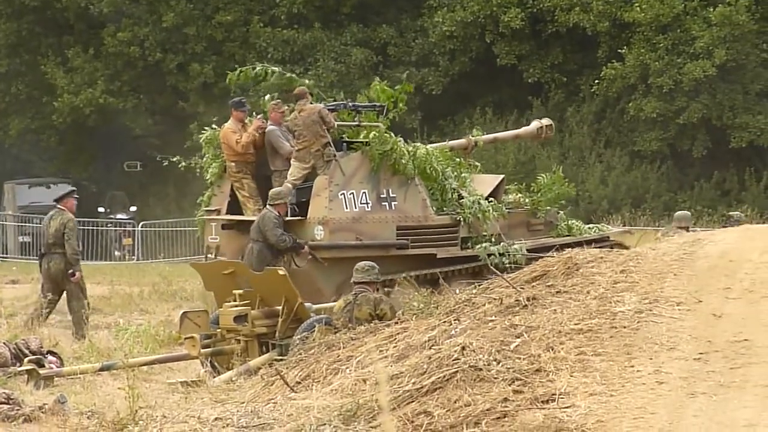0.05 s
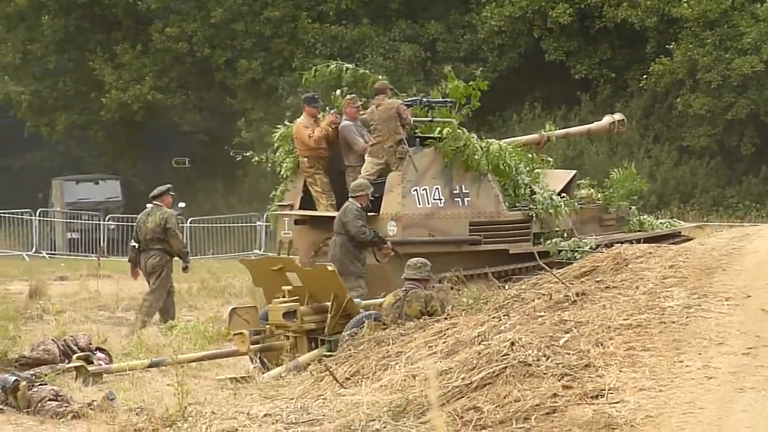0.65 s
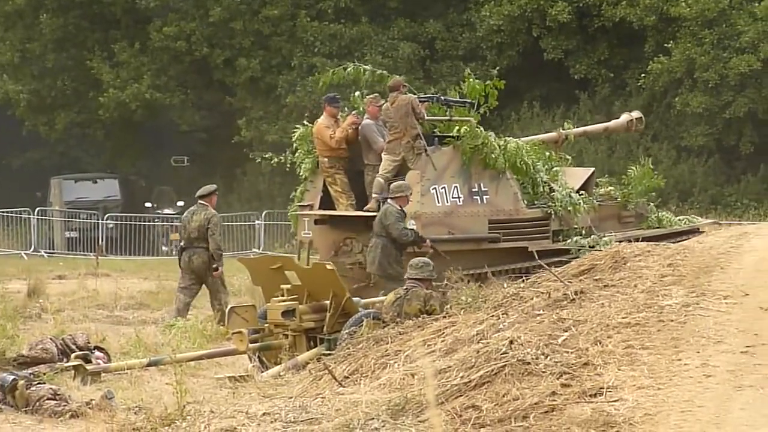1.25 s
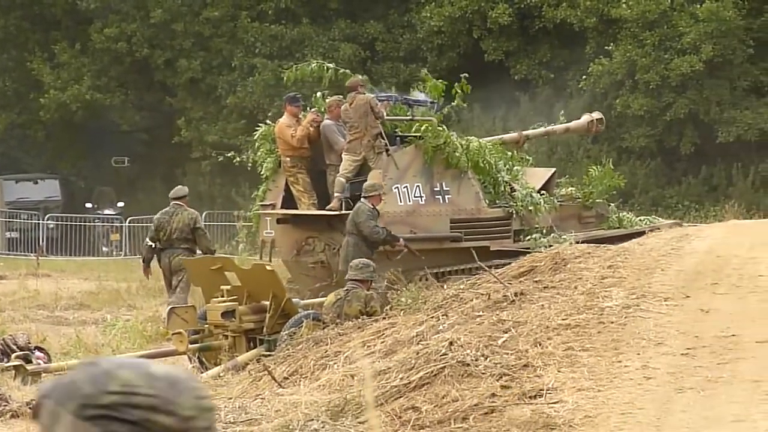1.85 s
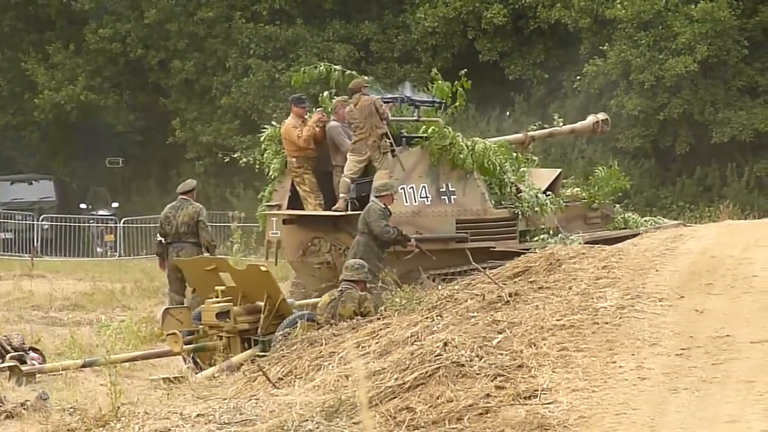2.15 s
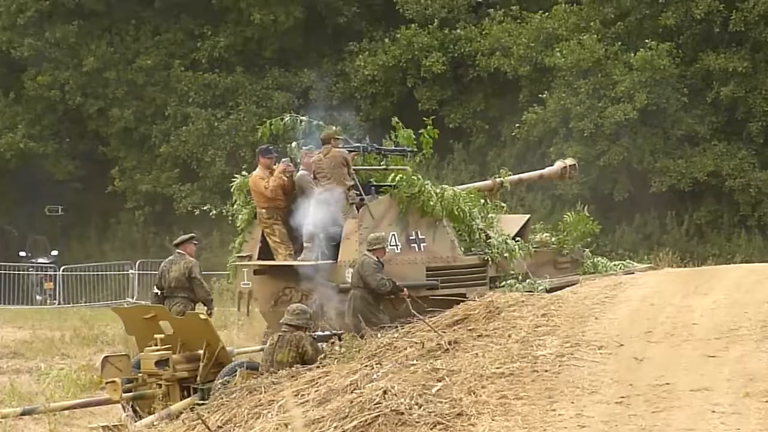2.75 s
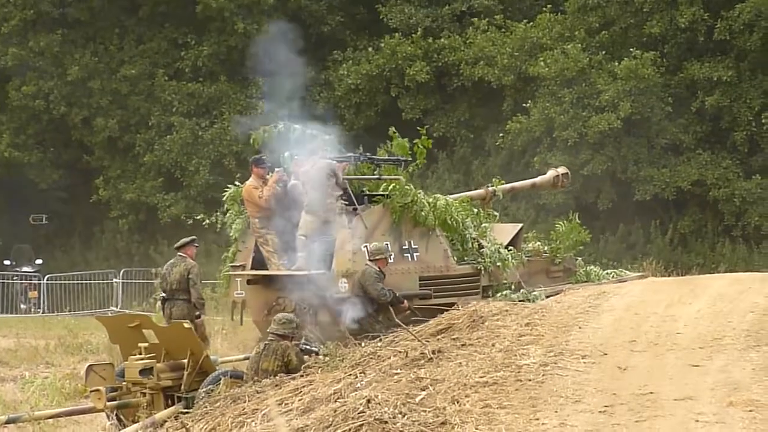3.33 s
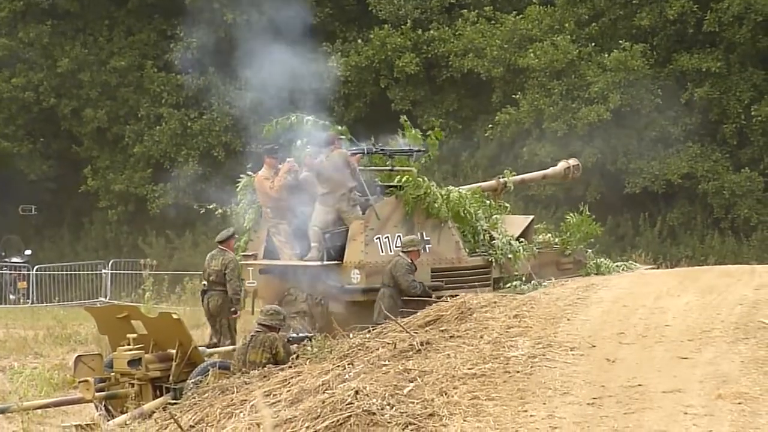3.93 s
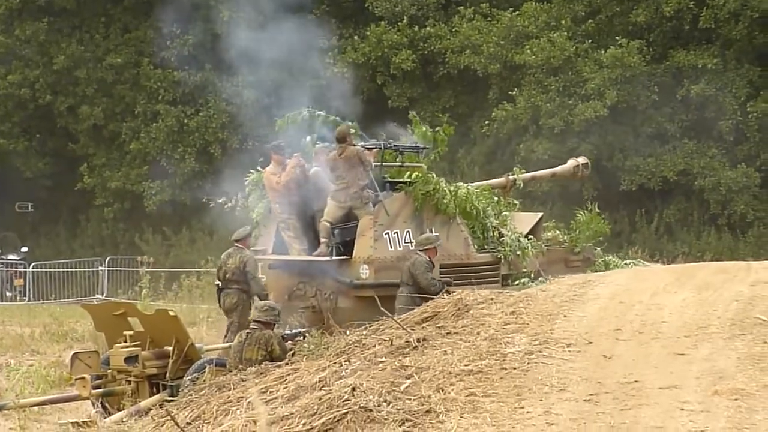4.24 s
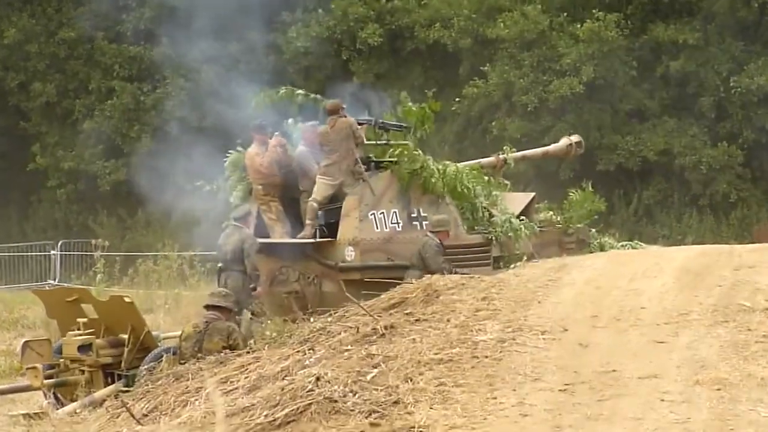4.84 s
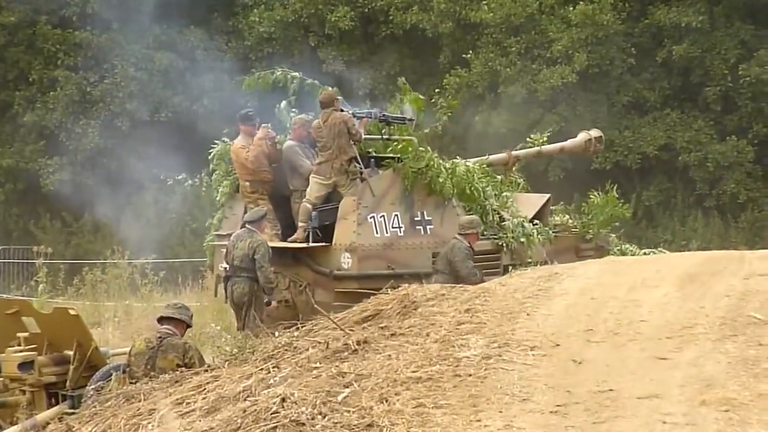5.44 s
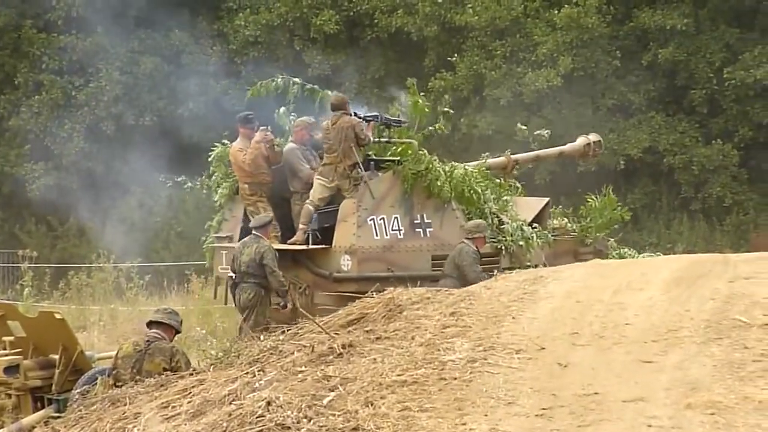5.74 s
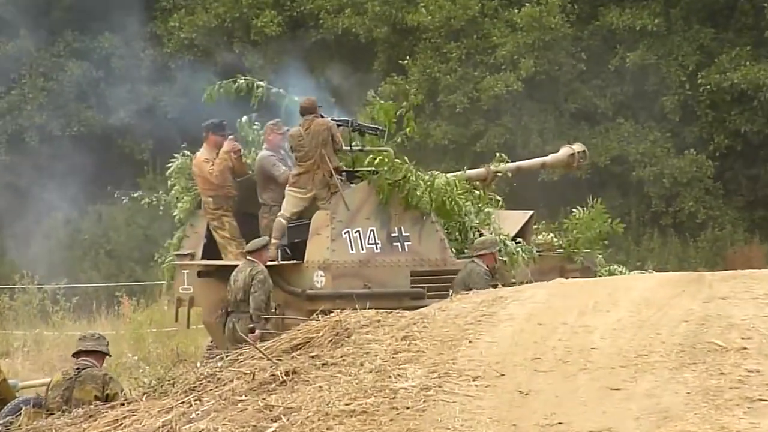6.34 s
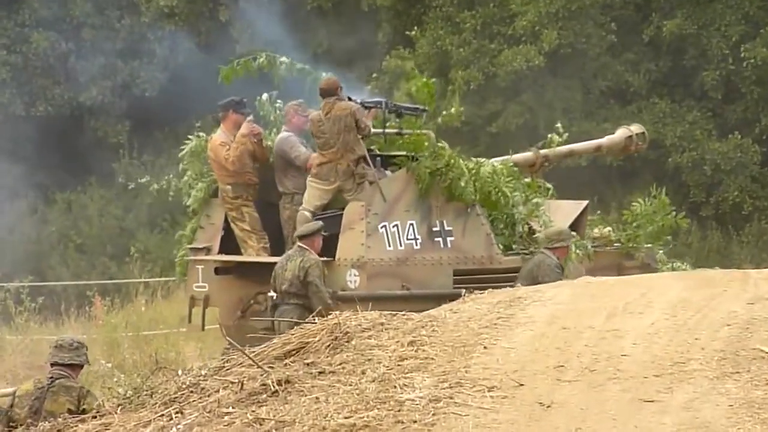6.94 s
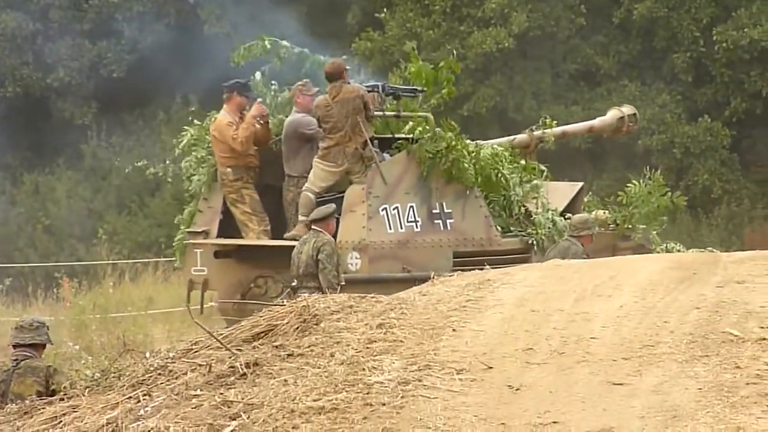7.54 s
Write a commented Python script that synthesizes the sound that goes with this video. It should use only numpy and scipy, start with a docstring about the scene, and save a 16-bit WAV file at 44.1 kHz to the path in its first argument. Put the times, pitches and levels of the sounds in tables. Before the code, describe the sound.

A machine gun fires four short bursts of blanks outdoors, with nearer pistol and rifle shots echoing off trees over a diesel engine.

```python
"""In a field by a wood, a machine gun on an armoured vehicle fires four bursts of blanks.
A machine pistol and rifles fire nearer by. Each shot is a sharp jump in air pressure that bounces
off things around it, and the trees roll it back as an echo. A diesel engine knocks, speeds up,
then sinks behind the shooting. The microphone hisses faintly; a limiter (an automatic volume
control) turns loud shots down, and the sharpest peaks clip."""
import sys
import numpy as np
from scipy import signal
from scipy.io import wavfile
from scipy.ndimage import uniform_filter1d, minimum_filter1d

SR = 44100
rng = np.random.default_rng(int(sys.argv[2]) if len(sys.argv) > 2 else 0)


def pcm_store(signal):
    """Save signal as 16-bit PCM."""
    levels = np.round(np.clip(np.atleast_2d(signal), -1, 1) * 32767)
    wavfile.write(sys.argv[1], SR, levels.astype(np.int16).T)


N = 338688

# the microphone's own hiss: f/Hz, level/dB
HISS_COLOUR = [(100, -22), (3000, -22), (11500, -21), (12700, -11), (13400, -1), (14200, -1), (15000, -7),
               (15800, -16)]
# narrow bands that sound hollow, the lowest cancelled by a bounce off the ground,
# the others in the microphone: f/Hz, width/Hz, depth/dB
HOLLOW_BANDS = [(879, 104, -7.5), (2595, 476, -30), (4600, 890, -19.5), (7840, 390, -24)]
# how much the microphone's two openings differ: f/Hz, side over mid/dB
STEREO_WIDTH = [(40, 4), (130, -48), (600, -24), (1200, -16), (2400, -4.5), (5000, -3.5), (14000, -10)]

# engine loudness as it sinks behind the shooting: t/s, level/dB
ENGINE_LEVEL = [(0, -30.5), (1.15, -29.5), (1.6, -31.5), (2.7, -35), (4, -39.5), (7.7, -43.5)]
# tone of the engine noise: f/Hz, level/dB
ENGINE_COLOUR = [(30, -36), (70, -25), (150, -14.5), (300, -8), (460, -7.5), (640, -0.5), (1150, -6.5),
                 (1500, -11), (2200, -7), (3300, -12), (6500, -7.5), (9000, -13.5), (15000, -13.5)]
# engine position as the microphone turns: t/s, left over right/dB
ENGINE_PAN = [(0, -1), (.8, -1.2), (1.6, 0.5)]
# ringing exhaust and engine covers: f/Hz, width/Hz, idle level/dB, level at speed/dB
COVER_RINGS = [(289.4, 24, -21, -16), (374, 34, -14.5, -17), (642, 45, -10.5, -15), (770, 27, -6.5, -6.5),
               (1014, 12, -14, -9.5), (1107, 50, -15.5, -6), (2120, 54, -26, -15.5),
               (2920, 100, -19, -15.5), (3510, 110, -19, -16)]
# each cylinder's knock: level/dB
CYLINDER_KNOCKS = [-1, -7, -12, -2]

# tone of the echo: f/Hz, level/dB
ECHO_COLOUR = [(50, -57), (130, -27.5), (260, -20.5), (420, -7.5), (680, 4), (1100, -1), (1700, -3.5),
               (2300, -11), (3500, -11.5), (6500, -11.5), (10000, -18.5), (15500, -30)]
# what air and leaves soak up: f/Hz, loss/(dB per s)
ECHO_LOSS = [(200, 1.1), (700, 2.3), (1500, 8.5), (3500, 21.2), (7000, 32.2), (14000, 74)]
# machine gun echoes from ground and wood: delay/s, spread/doublings of delay, level/dB
FAR_ECHOES = [(0.026, 1.59, 12), (.48, 0.84, 0)]
# the nearer guns' echoes from ground, close trees and wood: delay/s, spread/doublings, level/dB
NEAR_ECHOES = [(0.049, 1.3, 3.5), (0.261, 0.13, 1.5), (1.2, .65, -2.5)]

# rifle shots: t/s, high crack/dB, low boom/dB, direct shock against its scatter/dB, echo/dB
RIFLE_SHOTS = [(2.3361, -13.5, -19.5, 0, 8), (7.0048, -15.5, -12.5, -10.5, 3),
               (7.0574, -17.5, -16, -3.5, 5.5), (7.2991, -23.5, -21, -2, -3.5)]
# tone of a rifle blast: f/Hz, level/dB
RIFLE_COLOUR = [(40, -33), (120, 3), (250, 14), (400, 2.5), (650, 18.5), (1100, 10.5), (1500, 2.5),
                (2300, 0.5), (3200, -15.5), (5000, -8), (7000, -13), (11000, -15), (15500, -27)]
# machine pistol shots: t/s, crack/dB, boom/dB, shock/dB, echo/dB
PISTOL_SHOTS = [(3.1709, -3, -5, -3, 4.5), (3.2527, -6, -5, -4, 4.5), (3.3386, -6.5, -7, -2, 4),
                (3.9441, -2, -1, 0, -3)]
# tone of a pistol blast: f/Hz, level/dB
PISTOL_COLOUR = [(40, -17), (120, -5), (280, 11), (450, 6), (650, 2.5), (1100, 9.5), (1500, 3.5),
                 (2300, 3.5), (3300, -11), (5000, -2), (7000, -8), (11000, -7), (15500, -16)]
# machine gun bursts; a hitch in the ammunition belt starts a new row:
# first shot/s, last shot/s, shots, start-up lag/s, crack/dB, boom/dB, shock/dB, echo/dB
GUN_BURSTS = [(1.6105, 1.9780, 8, 0.015, -8.5, -12.5, -4, 5),
              (3.6082, 3.9517, 8, 0.0065, -13.5, -15.5, -1, 0),
              (4.0221, 4.0217, 1, 0, -17.5, -22.5, 3, -1.5), (5.2712, 5.3737, 3, .0063, -12, -14.5, -5, 0),
              (5.4328, 5.7192, 7, .0037, -15, -13.5, -3, 1.5),
              (6.7755, 6.8742, 3, 0.0056, -8.5, -13.5, -5.5, 2)]
# tone of a machine gun blast: f/Hz, level/dB
GUN_COLOUR = [(40, -96), (90, -20), (150, -1.5), (350, 0.5), (650, 4), (1100, 2), (1700, -1.5),
              (3000, -11.5), (6500, -7.5), (11000, -14.5), (15500, -21.5)]
# its bounces off the vehicle's body and the ground: delay/s, level/dB
GUN_BOUNCES = [(.0012, -6.5), (.0034, -56), (.0092, -13), (0.0124, -8.5)]
# armour plates that it sets ringing: f/Hz, level/dB, time to fade by 60 dB/s
ARMOUR_RINGS = [(163, -39.5, 0.13), (631, -28, 0.12), (731, -22, 0.12), (1002, -21, 0.085),
                (1145, -26, 0.061), (1674, -18.5, 0.045)]


def amp(db):
    """Turns decibels into a number to multiply by."""
    return 10 ** (np.asarray(db) / 20)


def unit(x):
    """Scales a signal to an average size (rms) of 1."""
    return x / np.sqrt(np.mean(x ** 2) + 1e-20)


def curve(rows, t):
    """Reads a table of (t/s, value) at times t."""
    return np.interp(t, *np.transpose(rows))


def spectrum(rows, hz):
    """Reads a table of (f/Hz, value), with octaves evenly spaced."""
    f, value = np.transpose(rows)
    return np.interp(np.log(hz + 1), np.log(f), value)


def shape(x, db_at, size=4096):
    """Filters by db_at(Hz) so that nothing sounds before its cause (minimum phase)."""
    log_gain = np.log(amp(db_at(abs(np.fft.fftfreq(size, 1 / SR)))))
    taps = np.fft.ifft(np.exp(np.conj(signal.hilbert(log_gain)))).real
    return signal.oaconvolve(x, taps[None], axes=1)[:, :x.shape[1]]


def colour(x, rows):
    """Gives a sound the tone listed in a table."""
    return shape(x, lambda hz: spectrum(rows, hz))


def passband(x, kind, hz, order=2):
    """Lets through the lows, the highs or a band."""
    return signal.lfilter(*signal.butter(order, hz, kind, fs=SR), x)


def add(mix, s, sound):
    """Mixes a sound in at s seconds."""
    part = mix[:, round(s * SR):][:, :sound.shape[1]]
    part += sound[:, :part.shape[1]]


def drift(per_s):
    """A slow random wander, about 1 in size."""
    knots = rng.standard_normal(400)
    return np.interp(np.arange(N) / SR * per_s, np.arange(len(knots)), knots)


def left_right(sound):
    """Turns mid (what both ears share) and side (how they differ) into left and right."""
    side = colour(sound[1:], STEREO_WIDTH)[0]
    return np.array([sound[0] + side, sound[0] - side])


def hiss():
    """The microphone's own faint, high noise."""
    noise = unit(colour(rng.standard_normal((2, N)), HISS_COLOUR))
    return amp(-47.5) * noise * amp([[0], [-6]])


def engine(idle_per_s=35, fast_per_s=48.5, rev_at_s=.79, rev_s=.09, knock_s=0.0076, chug_hz=160):
    """Each firing of the diesel is a puff of noise that clatters and sets the covers ringing."""
    t = np.arange(N) / SR
    level_db = curve(ENGINE_LEVEL, t)
    speed = 1 / (1 + np.exp((rev_at_s - t) / rev_s))  # 0 at idle, 1 at speed
    rate = idle_per_s + (fast_per_s - idle_per_s) * speed
    firings = .3 + np.cumsum(rate) / SR
    firings += .22 * np.sin(np.pi * firings / 2) ** 2  # every second cylinder knocks early
    number = firings.astype(int)
    strength = amp(np.array(CYLINDER_KNOCKS)[number % 4] + 1.1 * rng.standard_normal(N)[number])
    knock = strength * np.exp(-(firings % 1) / rate / knock_s)
    body = unit((1 + knock) * rng.standard_normal((2, N)))
    # each knock is a cluster of small ticks
    grit = amp(1.1 * unit(uniform_filter1d(rng.standard_normal(N), size=60)))
    clatter = unit((0.3 + 1.57 * knock) * grit * rng.standard_normal((2, N)))
    clatter *= amp(-3.5 + 0.32 * (level_db - level_db.max()))  # duller as the engine sinks
    noise = passband(body, "low", 3000) + passband(clatter, "high", 3000)
    out = amp(-1.5) * unit(colour(noise, ENGINE_COLOUR))
    for hz, width, idle_db, fast_db in COVER_RINGS:
        ring = unit(signal.lfilter(*signal.iirpeak(hz, hz / width, SR), body))
        out += ring * amp(idle_db + (fast_db - idle_db) * speed + 3 * drift(7))
    # the exhaust chugs on every second firing, most clearly at idle
    age = (firings % 2) / rate
    chug = np.sin(2 * np.pi * chug_hz * age) * age * np.exp(-age / 0.005)
    out[0] += unit(chug) * amp(-15 - 16 * speed + 2.3 * drift(13))
    return out * amp(level_db)


def swell(echoes, t):
    """Level in dB, t seconds after a shot: each echo builds up to its delay, then fades more slowly."""
    power = sum(amp(db) ** 2 * np.exp(-(np.log2((t + 1e-3) / delay) / spread) ** 2)
                for delay, spread, db in echoes)
    return 10 * np.log10(power + 1e-12)


def wood_echo(rows, echoes, level_db, tilt_db, patchy_db, count=4):
    """Countless trunks and leaves throw each shot back; the later the echo, the duller."""
    out, tails = np.zeros((2, N)), []
    for _ in range(count):
        noise = unit(colour(rng.standard_normal((2, 5 * SR // 2)), ECHO_COLOUR))
        hz, t, bands = signal.stft(noise, SR, nperseg=512)
        # random louder and softer patches across pitch and time
        patches = uniform_filter1d(rng.standard_normal(bands.shape[1:]), size=12, axis=0)
        patches = unit(uniform_filter1d(patches, size=4, axis=1))
        db = swell(echoes, t) - np.outer(spectrum(ECHO_LOSS, hz), t) + patchy_db * patches
        db += tilt_db * np.log2(1 + hz / 1500)[:, None]
        tails.append(signal.istft(bands * amp(db), SR, nperseg=512)[1])
    for k, (s, *_, echo_db) in enumerate(rows):
        add(out, s, amp(level_db + echo_db) * tails[k % count])
    return out


def leaf_sizzle(rows, level_db, delay_s=0.055, fade_s=0.039, size=12000):
    """A wall of leaves throws back only the highest part of each near crack."""
    out, t = np.zeros((2, N)), np.arange(size) / SR
    for s, *_ in rows:
        sizzle = passband(rng.standard_normal((2, size)), "band", [8000, 13000])
        add(out, s + delay_s, amp(level_db) * unit(sizzle) * np.exp(-t / fade_s))
    return out


def blast(shock_db, surroundings, tone, scatter_db, scatter_s, bounces, rings=()):
    """One bang (mid, side): a shock, its bounces, scatter from things nearby and any ringing metal."""
    size = surroundings.shape[1]
    t = np.arange(size) / SR
    bang = np.zeros((2, size))
    bang[0, 0] = amp(shock_db)
    # the shock reaches one side of the microphone first
    bang[1, :3] = amp(shock_db) * rng.choice([-1, 1]) * np.array([.7, 0, -.7])
    for delay, db in bounces:
        late = t - delay * rng.uniform(.98, 1.02)
        smear = np.exp(-(late / .0001) ** 2)  # a rough surface smears and dulls the bounce
        bang[0] += amp(db) * smear / smear.sum()
    paths = .7 * surroundings + .7 * rng.standard_normal((2, size))
    scatter = passband(paths, "high", 420)  # small things scatter little bass
    bang += amp(scatter_db) * scatter * (1 + t / scatter_s) * np.exp(-t / scatter_s)
    for hz, db, fade_s in rings:
        struck_db = db + 2.5 * rng.standard_normal()
        bang[0] += amp(struck_db - 60 * t / fade_s) * np.sin(2 * np.pi * hz * t) / 10
    return colour(bang, tone)


def shots(rows, level_db, split_hz=2000, **gun):
    """One gun's bangs, each with its own share of low boom and high crack."""
    out = np.zeros((2, N))
    surroundings = rng.standard_normal((2, 6000))  # these scatter all of the gun's shots alike
    onset = 441  # the first 10 ms set the levels
    for s, crack_db, boom_db, shock_db, _ in rows:
        bang = blast(shock_db, surroundings, **gun)
        bass = passband(bang, "low", split_hz)
        treble = -passband(bang, "high", split_hz)
        boom = amp(boom_db) * bass / bass[0, :onset].std()
        crack = amp(crack_db) * treble / treble[0, :onset].std()
        add(out, s, boom + crack)
    return amp(level_db) * out


def rifles():
    """Single rifle bangs that sizzle in the leaves."""
    bangs = shots(RIFLE_SHOTS, level_db=11, tone=RIFLE_COLOUR, scatter_db=-25, scatter_s=0.003,
                  bounces=[(.0014, -36), (.0036, -7)])
    return bangs + leaf_sizzle(RIFLE_SHOTS, level_db=-31)


def machine_pistol(slap_s=.1258):
    """Short, sharp bangs that sizzle in the leaves and slap back off something flat and distant."""
    bangs = shots(PISTOL_SHOTS, level_db=1.1, tone=PISTOL_COLOUR, scatter_db=-19, scatter_s=0.0015,
                  bounces=[(.0012, -14.5)])
    out = bangs + leaf_sizzle(PISTOL_SHOTS, level_db=-27.5)
    add(out, slap_s, amp(-15) * passband(bangs, "band", [1200, 4500], order=1))
    return out


def burst_shots(lag_left=.3, uneven_db=(1.3, 1.7, 3.5)):
    """Lists the machine gun's shots: its sliding bolt starts slowly, then settles into a beat."""
    rows = []
    for first_s, last_s, count, lag_s, *levels_db, echo_db in GUN_BURSTS:
        lags = lag_s * (1 - lag_left ** np.arange(round(count)))
        times = np.linspace(first_s, last_s - lags[-1], len(lags)) + lags
        for k, s in enumerate(times):
            # blanks burn unevenly
            crack_db, boom_db, shock_db = levels_db + np.array(uneven_db) * rng.standard_normal(3)
            if k == 0:  # the first shot is harder
                crack_db, boom_db = crack_db + 3.5, boom_db + 1.5
            rows.append((s, crack_db, boom_db, shock_db, echo_db))
    return rows


def machine_gun(rows):
    """Rapid bangs that bounce off the vehicle and the ground and set the armour ringing."""
    return shots(rows, level_db=10.45, tone=GUN_COLOUR, scatter_db=-24, scatter_s=0.004,
                 bounces=GUN_BOUNCES, rings=ARMOUR_RINGS)


def scene():
    """Guns and echoes ahead, over hiss and an engine that shifts from slightly right to the middle."""
    belt = burst_shots()
    guns = machine_gun(belt) + machine_pistol() + rifles()
    far = wood_echo(belt, FAR_ECHOES, level_db=-28, tilt_db=0.31, patchy_db=1.5)
    near = wood_echo(PISTOL_SHOTS + RIFLE_SHOTS, NEAR_ECHOES, level_db=-31, tilt_db=1.03, patchy_db=3.5)
    ahead = left_right(guns + far + near + hiss())
    pan_db = curve(ENGINE_PAN, np.arange(N) / SR)
    return ahead + left_right(engine()) * amp([pan_db / 2, -pan_db / 2])


def hollows(hz):
    """Level change in dB where sound is cancelled, by a ground bounce or in the microphone."""
    return sum(10 * np.log10(1 - (1 - amp(db) ** 2) / (1 + ((hz - f) / (width / 2)) ** 2))
               for f, width, db in HOLLOW_BANDS)


def smooth(x, lag_s):
    """Follows a signal with a short lag."""
    keep = np.exp(-1 / (lag_s * SR))
    return signal.lfilter([1 - keep], [1, -keep], x)


def limiter(x, threshold_db=-10, hold_s=0.041, release_s=0.066, attack_s=0.00043):
    """Turns loud sound down at once, holds it there, then lets go."""
    power = smooth((x ** 2).mean(0), lag_s=0.001)
    over_db = np.maximum(10 * np.log10(power + 1e-12) - threshold_db, 1e-6)
    half = int(hold_s * SR / 2)
    held_db = -minimum_filter1d(-over_db, 2 * half + 1, origin=half)
    fade = np.arange(N) / SR / release_s
    down_db = np.exp(np.maximum.accumulate(np.log(held_db) + fade) - fade)
    return x * amp(-smooth(down_db, attack_s))


def record(dry, low_hz=40, high_hz=15750):
    """Applies the hollow bands and limiter, rounds off peaks and trims the extreme lows and highs."""
    limited = limiter(shape(dry, hollows))
    clipped = .95 * limited / (1 + limited ** 6) ** (1 / 6)
    trimmed = passband(clipped, "high", low_hz, order=1)
    top_cut = signal.firwin(151, high_hz, window=("kaiser", 9), fs=SR)
    return signal.oaconvolve(trimmed, top_cut[None], "same")


dry = scene()
out = record(dry)
pcm_store(out)
```